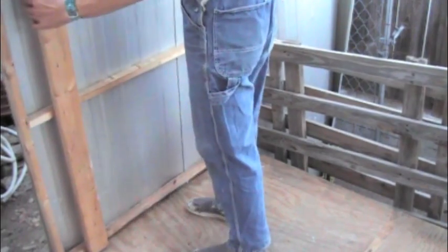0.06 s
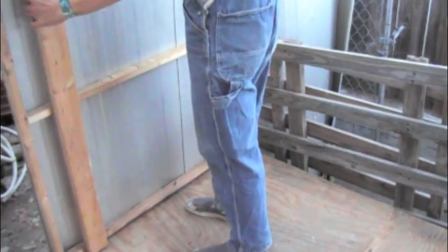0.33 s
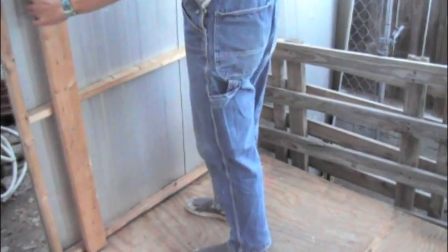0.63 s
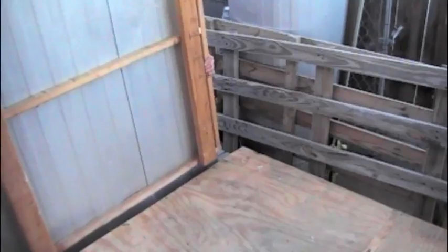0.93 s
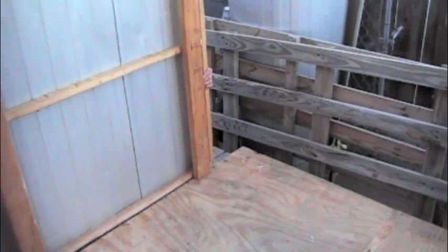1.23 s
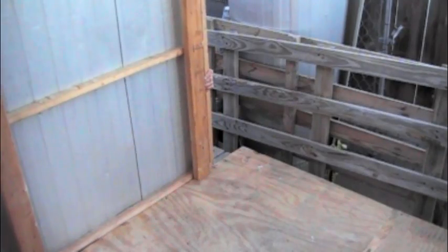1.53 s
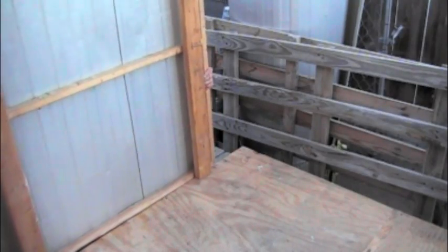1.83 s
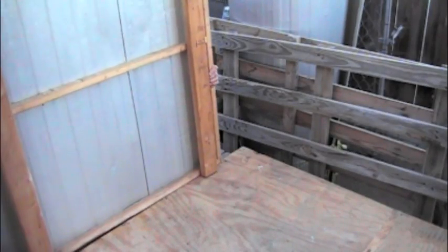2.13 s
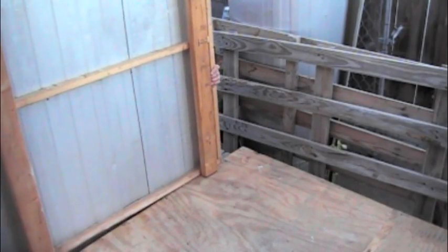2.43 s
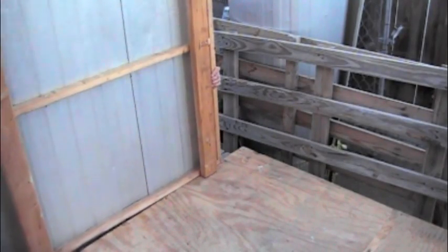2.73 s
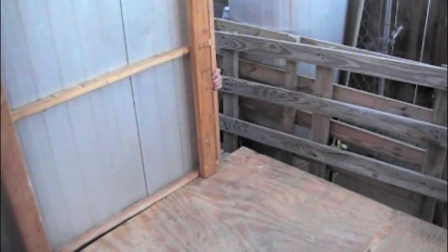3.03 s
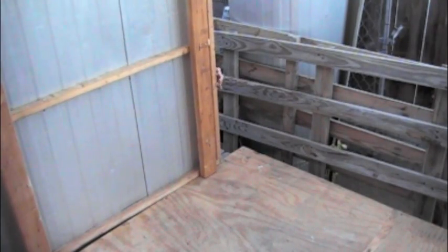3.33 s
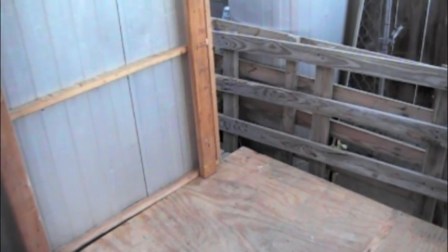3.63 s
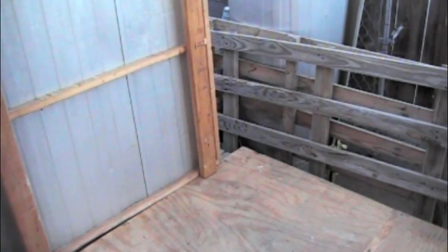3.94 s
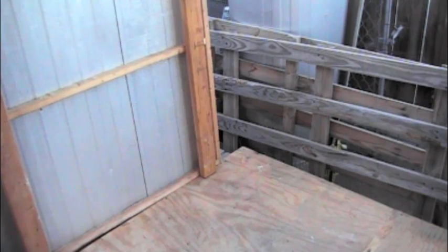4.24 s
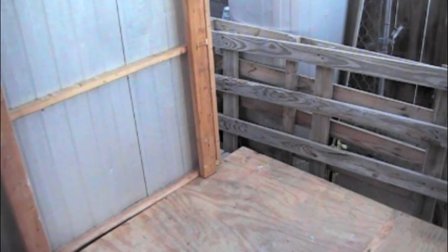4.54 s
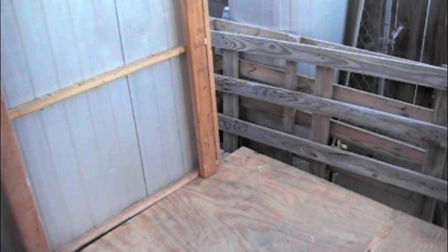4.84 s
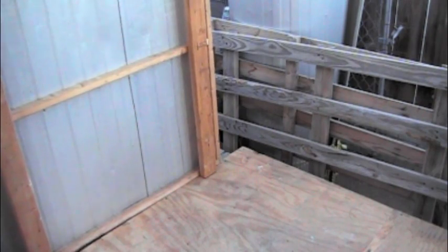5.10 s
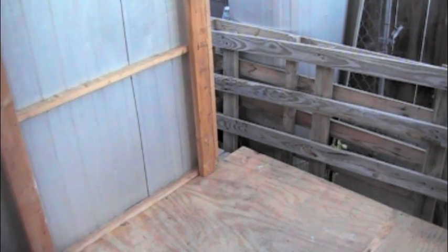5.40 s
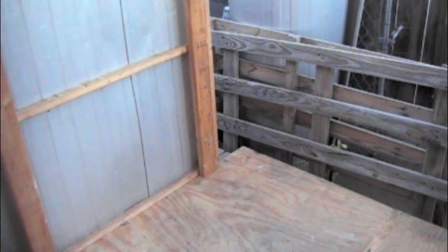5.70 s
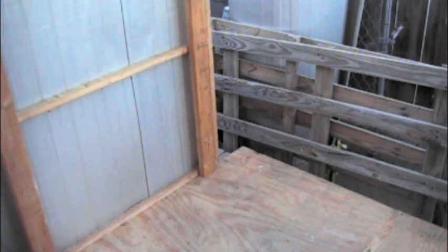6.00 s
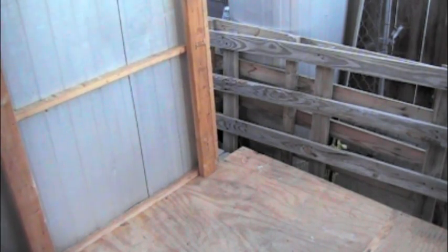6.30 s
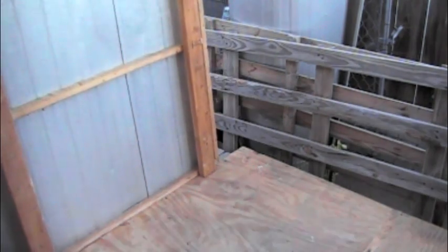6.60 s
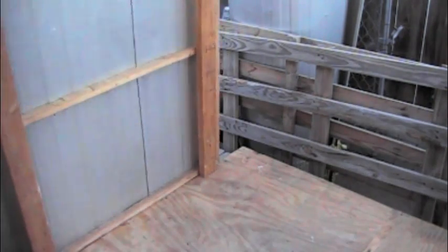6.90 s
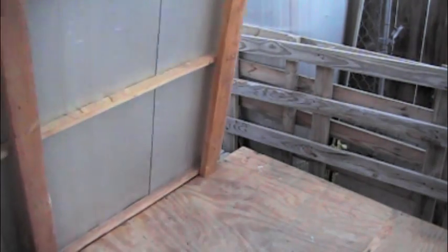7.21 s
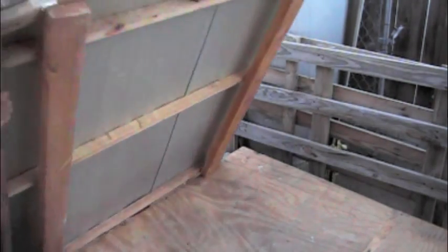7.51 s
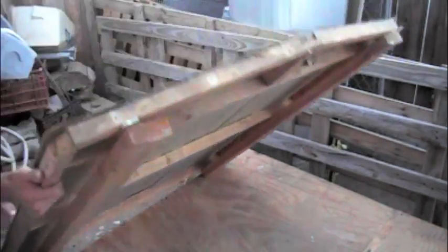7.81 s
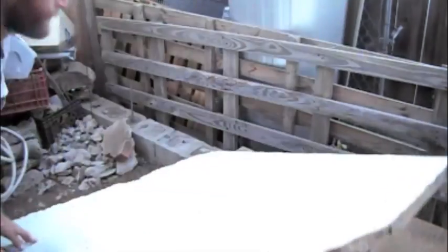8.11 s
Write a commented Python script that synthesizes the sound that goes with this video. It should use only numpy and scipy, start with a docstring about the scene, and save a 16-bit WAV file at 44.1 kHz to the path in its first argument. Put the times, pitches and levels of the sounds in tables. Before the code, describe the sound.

A wooden frame clad in thin aluminium sheet is shoved across a plywood deck. The loose metal chatters, snaps and gives low, hollow booms while the edge scrapes and the corners knock. After several rough bursts comes a quieter stretch of small ticks, then another loud rattle and a final sharp clatter as the panel tips. It is heard close up outdoors, over a soft, distant rush.

```python
"""A scrape, a tinny snap and a low boom: a wooden frame clad in thin aluminium sheet is shoved, rocked
and tipped onto a plywood deck, outdoors, close to a mid-side pair. Its edge scrapes in stick-slip and
its corners knock; the loose sheet chatters on the battens, snaps, sings as it bends and booms as it buckles.
A soft, distant rush lies under it; twice the level dips briefly."""
import sys
import numpy as np
from scipy import signal
from scipy.fft import rfft, irfft, next_fast_len
from scipy.io import wavfile
from scipy.ndimage import map_coordinates

SR = 44100
rng = np.random.default_rng(int(sys.argv[2]) if len(sys.argv) > 2 else 0)


def wrap_up_sound(samples):
    """Save the sound to the file named by the first command line argument, as 16-bit audio."""
    columns = np.atleast_2d(samples).T
    # keep every value between -1 and 1, then stretch to whole-number steps
    tamed = np.clip(columns, -1, 1)
    steps = np.round(tamed * 32767).astype(np.int16)
    wavfile.write(sys.argv[1], SR, steps)


N = 368235

# spectrum of the edge scraping on plywood: f/Hz, relative level/dB
SCRAPE_SPECTRUM = [(200, -50), (2000, 4), (3000, 5.5), (4700, 2), (6300, 3), (11200, 1), (12500, -5),
                   (15500, -17.5)]
# spectrum of the sheet's highest treble: f/Hz, relative level/dB
SPARKLE_SPECTRUM = [(2000, -56), (6000, -6.5), (7800, -3), (11200, -3.5), (12500, -10.5), (15500, -22.5)]


def amp(db):
    """Decibels to gain."""
    return 10 ** (np.asarray(db) / 20)


def unit(x):
    """x at rms 1."""
    return x / np.sqrt(np.mean(x ** 2) + 1e-20)


def along(points, hz):
    """Points (f/Hz, value) read on a log frequency axis."""
    f, v = np.transpose(points)
    return np.interp(np.log(hz + 1), np.log(f + 1), v)


def wobble(rate):
    """A smooth random curve, rate knots a second."""
    knots = rng.standard_normal(int(N * rate / SR) + 4)
    return map_coordinates(knots, [np.arange(N) * rate / SR])


def filtered(x, response):
    """x through a frequency response."""
    size = next_fast_len(N + SR // 2)
    return irfft(rfft(x, size) * response(np.fft.rfftfreq(size, 1 / SR)), size)[..., :N]


def coloured(x, spectrum):
    """x through a spectrum that keeps the power of white noise."""
    return filtered(x, lambda hz: unit(amp(along(spectrum, hz))))


def add(track, s, sound):
    """Mix a sound into a track from time s."""
    part = track[..., max(0, round(s * SR)):][..., :sound.shape[-1]]
    part += sound[..., :part.shape[-1]]


def stroke(s, length, rise_s, fall_db_per_s):
    """Gain of one movement: it builds up, holds until its length is over, then dies away."""
    t = np.arange(N) / SR - s
    return np.clip(t / rise_s, 0, 1) * amp(-fall_db_per_s * np.maximum(t - length, 0))


def slips(rate, spread_db):
    """Tiny slips at random moments and of random size, as (mid, side) of rms 1."""
    size = (rng.random(N) < rate / SR) * amp(spread_db * rng.standard_normal(N))
    return unit(size * rng.standard_normal((2, N)))


def rattle(rate, t60, share):
    """Envelope of rms 1: random taps, each dying away, carry a share of the power."""
    taps = (rng.random(N) < rate / SR) * rng.exponential(size=N)
    power = signal.lfilter([1], [1, -amp(-120 / (t60 * SR))], taps)
    return np.sqrt(1 - share + share * power / power.mean())


def distant_rush(level_db=-54.5):
    """The open air far from the microphone: a soft, slowly wavering rush."""
    # outdoor background spectrum: f/Hz, relative level/dB
    spectrum = [(25, -32), (60, -12), (110, -8.5), (200, 4.5), (350, 0), (900, -0.5), (1400, -4.5),
                (2300, -17), (5000, -22.5), (11000, -27.5), (15500, -45)]
    return coloured(rng.standard_normal((2, N)), spectrum) * amp(level_db + wobble(2.215))


def lip_ring(t60=1.25, half_width_hz=80):
    """A free lip of the sheet shivers on after a knock in a few thin, slightly fuzzy modes."""
    # the lip is set ringing: t/s, level/dB
    rings = [(2.433, -59), (3.046, -46)]
    # its modes: f/Hz, relative level/dB
    modes = [(3280, 6), (3560, -2), (4150, -4)]
    t, gain = np.arange(SR) / SR, np.zeros(N)
    for s, db in rings:
        add(gain, s, amp(db - 60 * t / t60))
    peaks = lambda f: sum(amp(db) / (1 + ((f - hz) / half_width_hz) ** 2) for hz, db in modes)
    return gain * unit(filtered(rng.standard_normal((2, N)), peaks))


def catches(rise_s=0.0054, t60=0.17, bright_db=-2):
    """The edge sticks, then tears free in a short, gritty rasp of bright slips."""
    # the edge lets go: t/s, level/dB
    releases = [(1.44, -42.5), (1.483, -43.5), (1.63, -42.5), (1.751, -42), (1.839, -42), (1.977, -45),
                (2.112, -30), (2.483, -50), (2.507, -49), (7.024, -49), (7.161, -46), (7.351, -49)]
    t, gain = np.arange(SR // 2) / SR, np.zeros(N)
    for s, db in releases:
        add(gain, s, amp(db - 60 * t / t60) * (1 - np.exp(-t / rise_s)))
    grit = lambda: gain * slips(rate=7800, spread_db=-0.5)
    return coloured(grit(), SCRAPE_SPECTRUM) + amp(bright_db) * coloured(grit(), SPARKLE_SPECTRUM)


def knocks(rise_s=0.00053, low_cut_hz=220):
    """A corner or fastener catches and rings at one pitch; so small a contact gives off no bass."""
    # hard point contacts of the frame: t/s, level before the low cut/dB, f/Hz, t60/s
    contacts = [(0.28, -9, 610, 0.01), (0.3017, -10, 500, 0.014), (0.547, 1.5, 1970, 0.0049),
                (0.894, -33, 1970, 0.018), (2.134, -6, 8500, 0.0034), (4.123, -14, 6150, 0.006),
                (5.405, -21, 7170, 0.025), (7.407, -11, 11050, 0.013), (7.432, -14, 11200, 0.011)]
    t, pings = np.arange(SR // 4) / SR, np.zeros((2, N))
    for s, db, hz, t60 in contacts:
        envelope = amp(db - 60 * t / t60) * (1 - np.exp(-t / rise_s))
        add(pings[0], s, envelope * np.sin(2 * np.pi * hz * t))
    return filtered(pings, lambda f: (1j * f / (1j * f + low_cut_hz)) ** 2)


def flexes(waver_db=2, pitch_waver=0.0119):
    """Bending tightens or slackens the sheet, so the hollow note of one mode slides and wavers."""
    # the bent sheet sings: t/s, length/s, level/dB, first f/Hz, last f/Hz
    bends = [(0.083, 0.07, -31, 365, 346), (0.275, 0.09, -30.5, 390, 423.5), (0.726, 0.038, -34, 250, 270),
             (2.345, 0.064, -39, 410, 380), (5.465, 0.082, -35, 355, 339), (5.605, 0.116, -35, 345, 383),
             (7.407, 0.143, -29.5, 720, 802), (7.522, 0.16, -36.5, 390, 520),
             (7.58, 0.02, -31.5, 988, 1020)]
    t, notes = np.arange(N) / SR, np.zeros((2, N))
    for s, length, db, first_hz, last_hz in bends:
        hz = np.interp(t, [s, s + length], [first_hz, last_hz]) * (1 + pitch_waver * wobble(60))
        gain = amp(db + waver_db * wobble(45)) * stroke(s, length, rise_s=0.012, fall_db_per_s=166)
        notes[0] += gain * np.sin(2 * np.pi * np.cumsum(hz) / SR)
    return notes


def shaking(rise_s=0.041):
    """How hard the sheet shakes: each shove stirs it, then it settles; their energies add up."""
    # pushes on the panel: t/s, length/s, level/dB, settling/(dB/s)
    shoves = [(0.047, 0.33, -37, 36), (0.492, 0.29, -39.5, 164), (0.98, .1, -68, 29),
              (1.099, 0.023, -42, 82), (1.396, .43, -48, 77), (1.922, 0.34, -38.5, 81),
              (2.137, 0.068, -40, 130), (2.294, 0.095, -36.5, 450), (2.507, 0.033, -48, 81),
              (2.951, 0.2, -38.5, 45), (3.75, 0.053, -58.5, 25), (4.93, 0.74, -57.5, 55),
              (5.338, 0.16, -31.5, 74), (5.597, 0.25, -40.5, 136), (6.137, 0.2, -55, 13),
              (6.788, 0.58, -48, 45), (7.415, 0.38, -34.5, 127), (8.125, 0.046, -36, 130)]
    return np.sqrt(sum((amp(db) * stroke(s, length, rise_s, settling)) ** 2
                       for s, length, db, settling in shoves))


def grinding(shake, drag_db=-12.5):
    """How hard the edge grinds: a light drag that follows the shaking, plus the skids."""
    # the edge breaks loose and skids over the deck: t/s, length/s, relative level/dB
    skids = [(0, 0.073, -60), (0.372, 0.028, -44.5), (0.617, 0.032, -34.5), (0.73, 0.052, -42),
             (0.932, 0.17, -63), (1.11, 0.017, -46), (1.415, 0.051, -49), (1.61, 0.046, -53),
             (1.88, 0.12, -47.5), (1.941, 0.067, -37), (2.001, .2, -37), (2.428, 0.14, -54),
             (2.719, 0.16, -53), (2.953, 0.044, -38), (3.623, 0.05, -61.5), (3.766, 0.069, -55),
             (3.894, 0.31, -63.5), (4.345, 0.19, -64.5), (4.962, 0.1, -61), (5.1, 0.55, -64.5),
             (5.353, 0.058, -33), (5.645, 0.08, -42.5), (6.175, 0.051, -53.5), (6.56, 0.54, -52.5),
             (6.93, 0.095, -46.5), (7.145, 0.24, -51.5), (8.257, 0.12, -60)]
    skid_power = sum((amp(db) * stroke(s, length, rise_s=0.029, fall_db_per_s=224)) ** 2
                     for s, length, db in skids)
    return np.sqrt(skid_power + (amp(drag_db) * shake) ** 2)


def rubbing(shake):
    """The edge grinds over the deck while the loose sheet chatters on its battens."""
    # spectrum of the sheet against the battens: f/Hz, relative level/dB
    chatter_spectrum = [(100, -59.5), (350, -35.5), (550, -0.5), (780, 4), (1150, 2), (1600, -1),
                        (2500, -9), (3450, -8.5), (4300, -15.5), (12000, -43)]
    taps = rattle(rate=200, t60=0.13, share=0.28)
    chatter = coloured(slips(rate=4000, spread_db=-0.5), chatter_spectrum) * shake * amp(0.5)
    scrape = coloured(slips(rate=9000, spread_db=2), SCRAPE_SPECTRUM) * grinding(shake) * amp(3.0)
    snags = rattle(rate=290, t60=0.078, share=0.61)  # on single grains and fasteners
    return (chatter + scrape * snags) * taps


def booming(shake, linger_s=0.036, shake_db=1, swell_s=0.012, buckle_t60=0.66, cancel_hz=135):
    """Shaking and buckling stir the panel's low bending modes, which store energy and boom on."""
    # the whole sheet buckles: t/s, level/dB
    buckles = [(0.084, -24.5), (0.272, -23), (.575, -27), (.67, -27.5), (.74, -28.5), (1.415, -39),
               (2.155, -26), (2.96, -39), (3.05, -31), (5.295, -32.5), (5.37, -26.5), (5.51, -30.5),
               (5.6, -28)]
    # the panel's bending modes: f/Hz, width/Hz, relative level/dB
    modes = [(153, 17, -7.5), (180, 18, -6), (245, 42, -2), (296, 24, -2.5), (354, 24, 2), (398, 36, 1.5),
             (462, 55, -1.5), (542, 38, 0), (632, 40, -3), (725, 40, -10), (842, 22, -7), (1085, 40, -11)]
    t, retained = np.arange(SR) / SR, np.exp(-1 / (linger_s * SR))
    power = signal.lfilter([1 - retained], [1, -retained], (shake * amp(shake_db)) ** 2)
    for s, db in buckles:
        add(power, s, (amp(db - 60 * t / buckle_t60) * (1 - np.exp(-t / swell_s))) ** 2)

    def response(f):
        """The panel's modes as they radiate, plus a faint thud from the plywood."""
        bending = sum((-1) ** k * amp(db) * 1j * f * width / (hz * hz - f * f + 1j * f * width)
                      for k, (hz, width, db) in enumerate(modes))
        radiation = 0.72 + f ** 4 / (f ** 4 + cancel_hz ** 4)  # long waves cancel round the open edges
        soft_push = 1 / (1 + (f / 1900) ** 4)  # holds no treble
        deck = amp(-34.5) * f / (f + 35) / (1 + (f / 110) ** 4)
        return bending * radiation * soft_push + deck

    return np.sqrt(power) * unit(filtered(slips(rate=3000, spread_db=0.0), response))


def snaps(base_rise_s=0.0019, db_per_doubling=10):
    """The sheet snaps on the frame: fast treble waves arrive first, the slower clang builds and lasts."""
    # snaps: t/s, relative level/dB of sparkle, of bite and of clang, base t60/s
    hits = [(0.066, -47, -33, -27.5, 0.28), (0.156, -38.5, -33.5, -32, 0.18), (0.22, -45, -38.5, -46, 0.17),
            (0.281, -38.5, -41, -35, 0.3), (0.5465, -43, -28.5, -36, 0.26), (0.568, -36.5, -30, -26, 0.25),
            (0.625, -43, -29.5, -32, 0.27), (0.7384, -42, -39.5, -36, 0.38),
            (1.088, -54.5, -49, -46.5, 0.48), (1.4164, -52.5, -47, -49, 0.38),
            (1.555, -50, -43.5, -55, 0.29), (1.669, -65, -43.5, -46, 0.14),
            (1.767, -51, -42.5, -43.5, 0.28), (2.1324, -35, -33.5, -50, 0.21), (2.148, -49, -43, -32, 0.15),
            (2.197, -37, -30, -30, 0.16), (2.432, -50, -52, -64, 0.36), (2.7626, -31, -33.5, -38, 0.24),
            (2.95, -50, -53, -49, 0.33), (3.046, -41, -35.5, -37, 0.4), (4.12, -39.5, -32, -41.5, 0.18),
            (4.415, -62, -48.5, -50.5, 0.07), (5.2862, -47, -41, -41.5, 0.4),
            (5.3459, -36.5, -32.5, -51, 0.087), (5.375, -32.5, -28.5, -28.5, 0.09),
            (5.437, -41, -32.5, -31.5, 0.14), (5.597, -36.5, -33, -31, 0.21),
            (5.695, -37, -44, -60.5, 0.39), (5.814, -45, -40, -46.5, 0.27), (5.923, -50, -43.5, -75, 0.32),
            (6, -49.5, -51, -61, 0.082), (6.385, -47.5, -46.5, -56, 0.24), (6.6345, -41, -47.5, -59, 0.3),
            (6.818, -45, -41.5, -41.5, 0.43), (6.8589, -38.5, -26, -37.5, 0.25),
            (6.981, -43.5, -40, -68, 0.28), (7.4031, -24.5, -27, -32, 0.15), (7.432, -36, -33, -33.5, 0.73),
            (7.4719, -28, -26, -32.5, 0.34), (7.581, -31.5, -26.5, -27, 0.46),
            (8.148, -47, -34, -30.5, 0.2)]
    # spectrum of the hard upper-mid bite: f/Hz, relative level/dB
    bite_spectrum = [(500, -35), (1700, -2.5), (2500, -4), (3800, -0.5), (4800, -6), (6300, -5),
                     (8000, -16), (14000, -33)]
    # spectrum of the lower clang: f/Hz, relative level/dB
    clang_spectrum = [(90, -41), (300, 0.5), (660, -2.5), (750, 2.5), (920, 1.5), (1040, 3.5), (1600, -3.5),
                      (2200, -3), (3200, -12), (8000, -56)]
    _, sparkle_db, bite_db, clang_db, _ = np.transpose(hits)
    rises = base_rise_s * 2 ** ((clang_db - sparkle_db) / db_per_doubling)  # dull snaps swell slowly

    def band(levels, spectrum, t60_scale, lag_s, crack_db, crack_t60):
        """One band of every snap: a crack, and waves that criss-cross the sheet and die away."""
        t, bursts = np.arange(SR) / SR, np.zeros((2, N))
        for (s, *_, t60), db, rise in zip(hits, levels, rises):
            after = np.maximum(t - rise, 0)
            decay = amp(-60 * after / (t60 * t60_scale)) + amp(crack_db - 60 * after / crack_t60)
            swell = np.minimum(t / (rise + lag_s), 1)
            add(bursts, s, amp(db) * swell * decay * rng.standard_normal((2, SR)))
        return coloured(bursts, spectrum)

    sparkle = band(sparkle_db + 0.5, SPARKLE_SPECTRUM,
                   t60_scale=0.75, lag_s=0.00049, crack_db=0, crack_t60=0.05)
    bite = band(bite_db + 2.5, bite_spectrum, t60_scale=0.93, lag_s=0.00093, crack_db=-20, crack_t60=0.35)
    clang = band(clang_db + 4, clang_spectrum, t60_scale=1.46, lag_s=0.003, crack_db=-25, crack_t60=0.23)
    return sparkle + bite + clang


def sheet_ring(contacts, ring_db):
    """The contacts, with the crowd of close metal modes that they wake."""
    # decay of the sheet's crowded modes: f/Hz, t60/s
    ring_times = [(150, 0.17), (1000, 0.21), (4000, 0.062), (12000, 0.087)]
    hz, t, noise = signal.stft(rng.standard_normal((2, SR // 2)), SR, nperseg=256)
    decay = amp(-60 * t / along(ring_times, hz)[:, None])
    tail = signal.istft(noise * decay / np.linalg.norm(decay, axis=1, keepdims=True), SR, nperseg=256)[1]
    ring = signal.fftconvolve(contacts, tail / np.linalg.norm(tail[0]), axes=1)[:, :N]
    return (contacts + amp(ring_db) * ring) / np.hypot(1, amp(ring_db))


def scene():
    """The panel close up in the open: bass in the middle, treble wide, the distant rush wider still."""
    # stereo width at the microphone: f/Hz, side gain/dB
    width = [(60, -13.5), (140, -39), (330, -27), (770, -18.5), (1790, -28.5), (2740, -26.5), (4190, -13.5),
             (6410, -7), (10000, -2.5)]
    shake = shaking()
    contacts = rubbing(shake) + catches() + snaps()
    panel = sheet_ring(contacts, ring_db=-8.0) + booming(shake) + flexes() + lip_ring() + knocks()
    mid, side = panel + distant_rush() * amp([[0], [5]])
    side = filtered(side, lambda hz: amp(along(width, hz)))
    return np.array([mid + side, mid - side])


def record(dry):
    """The level dips briefly twice; nothing is kept above the band limit."""
    # dips in level: t/s, fall/s, recovery/s
    dips = [(0.953, 0.03, 0.091), (6.553, 0.09, 0.12)]
    top_hz = 15900
    t, gain = np.arange(N) / SR, np.ones(N)
    for s, fall, recovery in dips:
        gain *= np.interp(t, [s - fall, s, s + recovery], [1, 0.06, 1]) ** 1.4
    return filtered(dry * gain, lambda hz: hz < top_hz)


dry = scene()
out = record(dry)
wrap_up_sound(out)
```